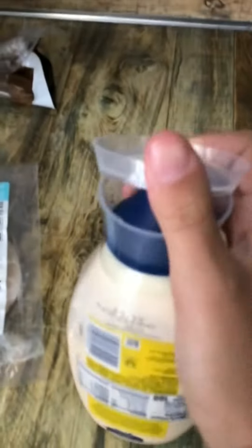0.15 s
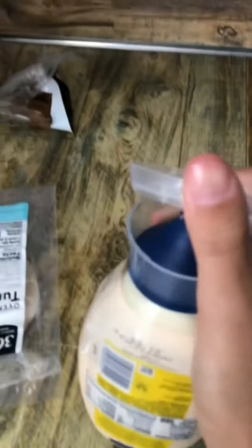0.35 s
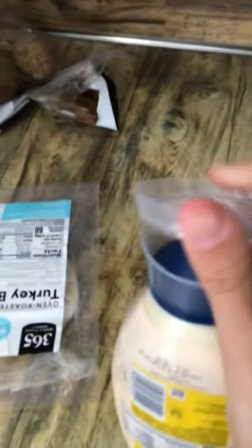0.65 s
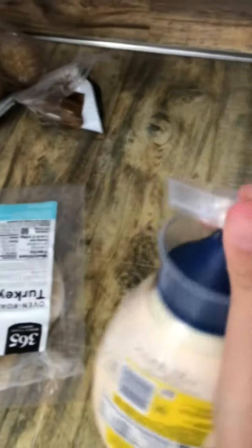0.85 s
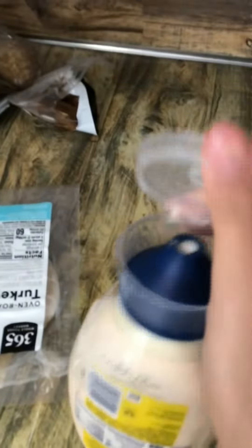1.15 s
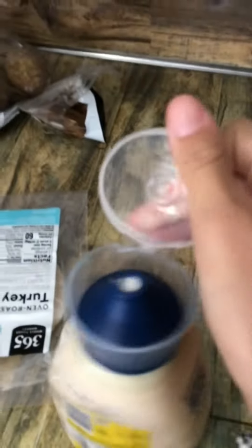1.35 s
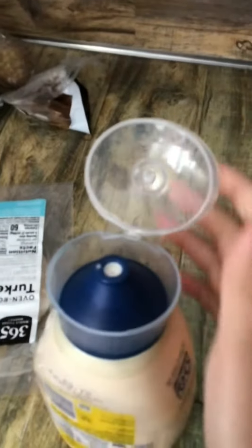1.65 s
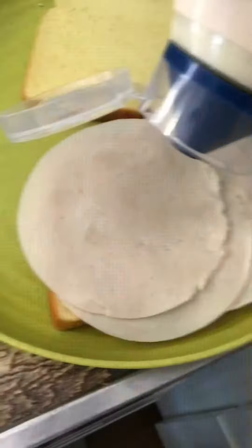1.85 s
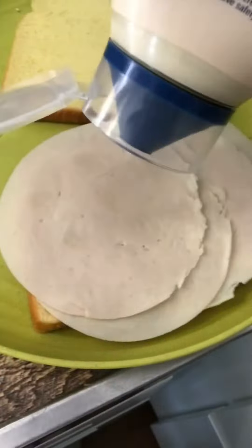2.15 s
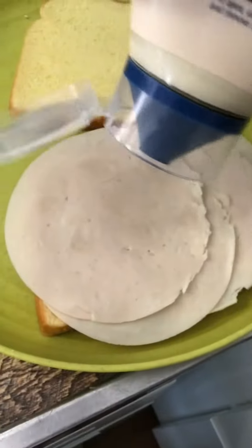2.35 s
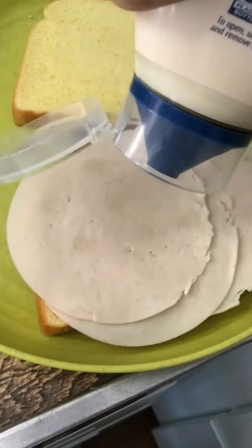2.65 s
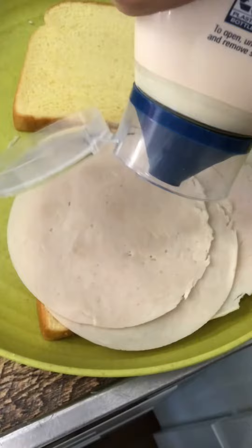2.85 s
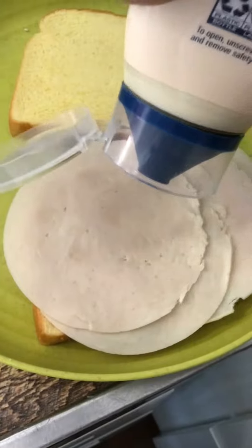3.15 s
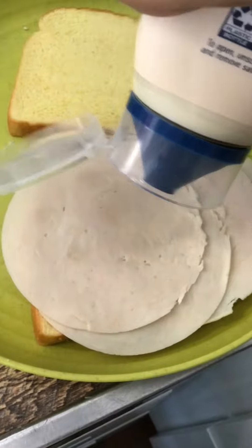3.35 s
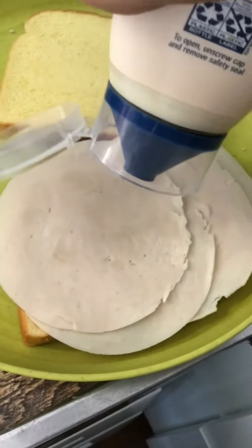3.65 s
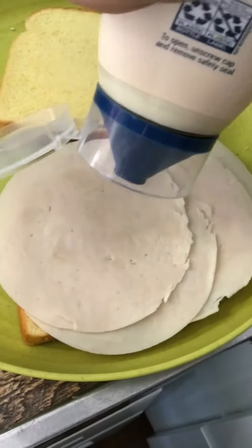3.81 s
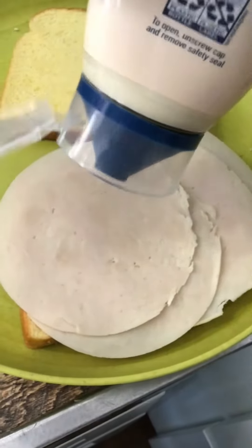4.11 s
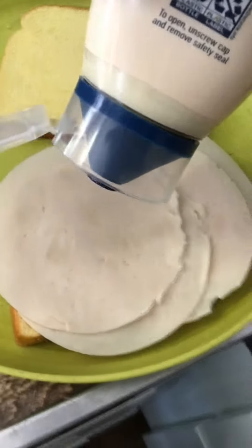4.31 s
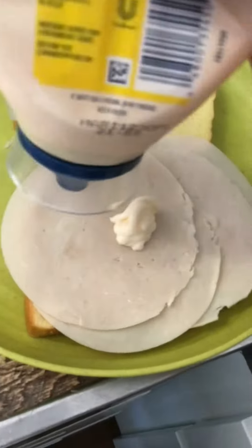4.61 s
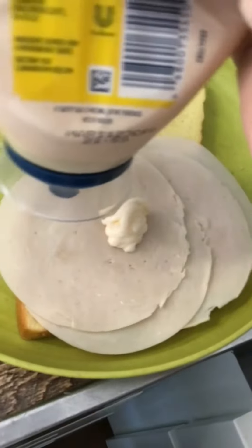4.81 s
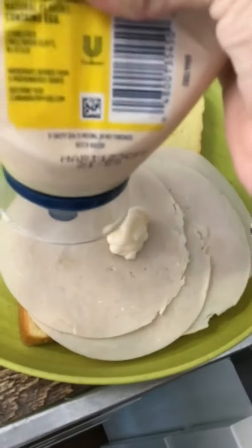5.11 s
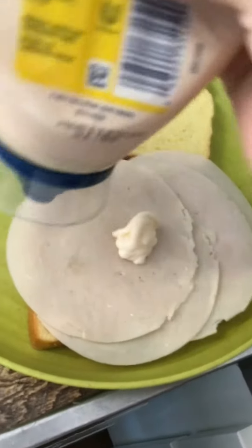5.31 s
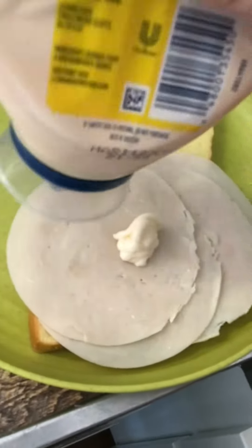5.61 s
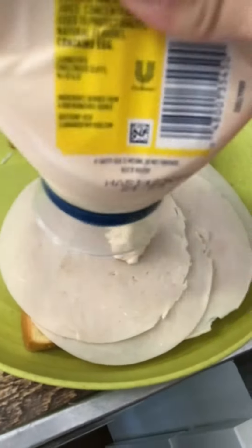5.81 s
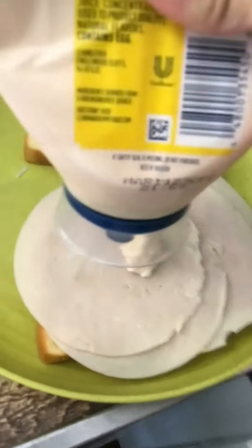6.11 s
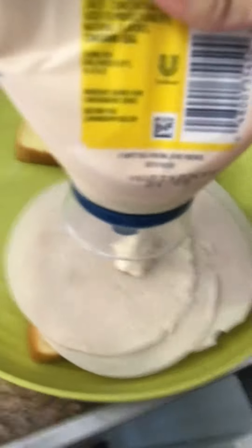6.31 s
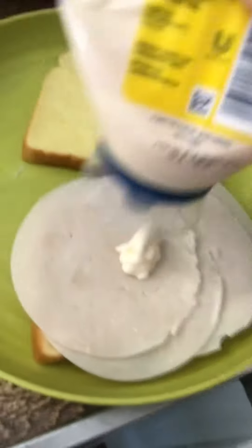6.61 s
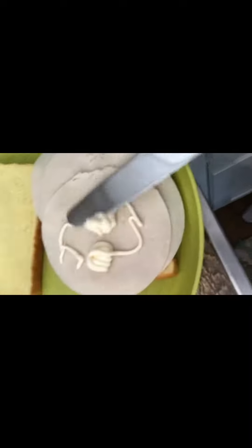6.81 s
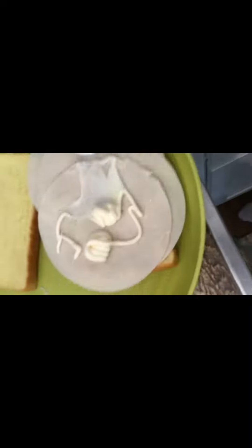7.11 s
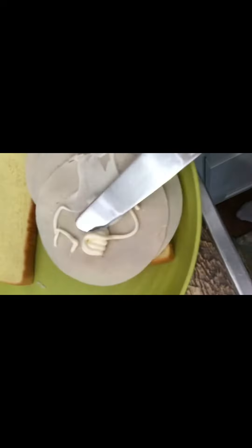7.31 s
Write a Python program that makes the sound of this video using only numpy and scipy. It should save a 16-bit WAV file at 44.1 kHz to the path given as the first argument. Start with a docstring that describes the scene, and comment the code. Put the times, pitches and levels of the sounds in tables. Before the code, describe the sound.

In a small humming kitchen, a plastic bottle is bumped, flipped open and squeezed with sharp crackles, hollow pops and one wet spit.

```python
"""Squeezing sauce over a sandwich

In a small room where an appliance hums, a thumb rubs on the lid of a plastic squeeze bottle and the bottle
bumps the counter (decaying sines). The lid snaps open and the plastic crackles (noise bursts through resonances).
The walls buckle (low sine thumps and clacks), air hisses through the nozzle (coloured random grains) and
sauce splutters (quick pulses ring the nozzle's air). A soft smear (finer, darker grains) fades at the end."""
import sys
import numpy as np
from scipy import signal
from scipy.fft import rfft, irfft
from scipy.io import wavfile
from scipy.ndimage import uniform_filter1d

SR = 44100
rng = np.random.default_rng(int(sys.argv[2]) if len(sys.argv) > 2 else 0)


def generate_wav(signal):
    """Clip the signal to [-1, 1] and save it as 16-bit WAV at the path in sys.argv[1]."""
    frames = np.transpose(np.atleast_2d(signal))
    scaled = np.clip(frames, -1, 1) * 32767
    pcm = np.round(scaled).astype(np.int16)
    wavfile.write(sys.argv[1], SR, pcm)


N = 328986
TIME = np.arange(N) / SR  # the whole scene, in seconds
RING_TIME = TIME[:SR // 2]  # half a second, for one short sound

# Colour of a dull knock, for bumps and wall clacks: (frequency [Hz], level [dB])
KNOCK_COLOUR = [(30, -36), (100, -16), (350, 12), (700, 0), (1400, -1), (2500, -12), (5000, -24),
                (16000, -44)]


def amp(db):
    """Turns decibels into a gain."""
    return 10 ** (np.asarray(db) / 20)


def unit(x):
    """Scales a sound to an average strength (rms) of 1."""
    return x / np.sqrt(np.mean(x ** 2) + 1e-30)


def read(points, hz):
    """Reads a table between its points, along a log-frequency axis."""
    f, value = np.transpose(points)
    return np.interp(np.log(hz + 1), np.log(f), value)


def level(curve):
    """Turns a (time [s], level [dB]) curve into a smoothed gain, practically silent outside the curve."""
    s, db = np.transpose(curve)
    gain = amp(np.interp(TIME, s, db, left=-140, right=-140))
    return uniform_filter1d(gain, 128)


def add(mix, s, sound):
    """Mixes a sound in at time s."""
    part = mix[max(round(s * SR), 0):][:len(sound)]
    part += sound[:len(part)]


def colour(x, points, size=4096):
    """Filters a sound to a (frequency [Hz], level [dB]) colour, without any sound ahead of its cause."""
    gain = amp(read(points, np.fft.rfftfreq(size, 1 / SR)))
    # folding the cepstrum makes the filter minimum-phase
    cepstrum = irfft(np.log(gain))
    cepstrum[1:size // 2] *= 2
    cepstrum[size // 2:] = 0
    response = irfft(np.exp(rfft(cepstrum)))
    return signal.oaconvolve(x, response)[:len(x)]


def resonate(x, hz, width_hz):
    """Lets through one resonance, with gain 1 at its centre."""
    b, a = signal.iirpeak(min(hz, SR / 2 - 1), hz / width_hz, SR)
    return signal.lfilter(b, a, x)


def burst(decay_s):
    """Makes noise of energy 1 that dies away exponentially."""
    x = rng.standard_normal(len(RING_TIME)) * np.exp(-RING_TIME / max(decay_s, 1 / SR))
    return x / np.linalg.norm(x)


def struck(x, size=220):
    """Scales a blow so that its loudest 5 ms have rms 1."""
    return x / np.sqrt(uniform_filter1d(x ** 2, size).max())


def ring(modes):
    """Adds up dying sines, each from (frequency [Hz], level [dB], time to fall 60 dB [s])."""
    return sum(amp(db - 60 * RING_TIME / t60) * np.sin(2 * np.pi * hz * RING_TIME) for hz, db, t60 in modes)


def kitchen(x, size=256):
    """Gives the diffuse echo of the small room: noise that dies at a different speed in each band."""
    # How long the echo lasts: (frequency [Hz], time to fall 60 dB [s])
    echo_t60 = [(150, 0.24), (500, 0.2), (2500, 0.25), (4000, 0.23), (6000, 0.23), (10000, 0.18),
                (16000, 0.19)]
    hz, t, z = signal.stft(rng.standard_normal(len(RING_TIME)), SR, nperseg=size)
    fade = amp(-60 * t / read(echo_t60, hz)[:, None])
    tail = signal.istft(z * fade, SR, nperseg=size)[1][:len(RING_TIME)]
    tail *= 1 - np.exp(-(RING_TIME / 0.0027) ** 2)  # the echo builds up over a few ms
    return signal.fftconvolve(x, tail / np.linalg.norm(tail))[:len(x)]


def grains(per_s, spread_db):
    """Makes tiny slips at random times, a few larger than the rest."""
    sizes = amp(spread_db * np.minimum(rng.exponential(1, N), 4)) * rng.standard_normal(N)
    return sizes * (rng.random(N) < per_s / SR)


def flutter(rate_hz, depth_db):
    """Makes a gain that wavers at random, below rate_hz and by depth_db rms."""
    lowpass = signal.butter(2, rate_hz, fs=SR, output="sos")
    slow = signal.sosfilt(lowpass, rng.standard_normal(N))
    return amp(depth_db * unit(slow))


def room_air(upper_db=-69.5):
    """The quiet air of the room is steady coloured noise, set by its strength above 500 Hz."""
    # Colour of the room air: (frequency [Hz], level [dB])
    air_colour = [(15, -88), (25, -61.5), (76, -45.5), (89, -37.5), (108, -13.5), (130, -14.5),
                  (145, -33.5), (217, -13), (293, -14.5), (326, -11.5), (405, -25.5), (677, -30.5),
                  (2220, -44), (6210, -46.5), (16000, -57)]
    air = colour(rng.standard_normal(N), air_colour)
    upper = signal.sosfilt(signal.butter(6, 500, "high", fs=SR, output="sos"), air)
    return amp(upper_db) * air / upper.std()


def appliance_hum(louder_from_s=1.86, early_db=-10.0):
    """The appliance hums in sines whose phase wanders at random; the hum is softer at first."""
    # Tones of the hum: (frequency [Hz], rms level once louder [dB], width of the wander [Hz])
    tones = [(121, -74, 12), (328.8, -55, 1), (384.4, -68, 6.7)]
    hum = np.zeros(N)
    for hz, db, width_hz in tones:
        drift = np.cumsum(rng.standard_normal(N)) * np.sqrt(abs(width_hz) / SR)
        hum += amp(db) * np.sqrt(2) * np.sin(2 * np.pi * hz * TIME + drift)
    return hum * np.where(TIME > louder_from_s, 1, amp(early_db))


def thumb_rub(lid_db=3, lid_opens_s=1.17):
    """The thumb slides in tiny slips that ring the lid; its pushes stop when the lid opens."""
    # Pushes of the thumb: (middle [s], level [dB], half length [s])
    pushes = [(0.223, -65, 0.057), (0.528, -67, .07), (0.678, -54, 0.017), (0.843, -55, .04),
              (0.974, -61.5, 0.053), (1.179, -36, 0.063)]
    # Colour of the rubbing: (frequency [Hz], level [dB])
    rub_colour = [(350, -48), (600, -10.5), (2570, 2), (3080, -5), (3680, -1), (5190, -4.5), (6370, -5.5),
                  (10500, -7), (13600, -7), (16000, -13.5)]
    # Resonances of the lid: (frequency [Hz], width [Hz], level before lid_db is added [dB])
    lid_modes = [(2600, 210, -14), (3700, 99, -11), (4300, 160, -8), (6300, 210, 6.5), (9070, 210, -2.5)]
    push = sum(amp(db) * np.exp(-((TIME - s) / half_s) ** 2) for s, db, half_s in pushes)
    push = push * (TIME < lid_opens_s)
    slips = colour(grains(3000, 0.72), rub_colour)
    lid = sum(amp(lid_db + db) * resonate(slips, hz, width_hz) for hz, width_hz, db in lid_modes)
    return unit(slips + lid) * push * flutter(120, 0.39)


def bumps(rise_s=0.014, thud_t60=0.13, thud_db=1, knock_db=-1, room_db=-10, boom_db=-9):
    """The full bottle bumps the counter: a dull knock, then a low thud swells with the counter's own tones."""
    # Bumps, before thud_db and knock_db are added:
    # (time [s], thud level [dB], thud frequency [Hz], knock level [dB], counter level against thud [dB])
    bump_table = [(0.481, -29, 131.2, -42, -22), (0.72, -32.5, 140, -44.5, -13),
                  (1.171, -13.5, 135, -21, -6), (1.322, -35, 145.5, -39, -10), (1.412, -43, 167, -42, 13),
                  (1.422, -30, 145.7, -34, -11)]
    # Tones of the counter top: (frequency [Hz], level [dB], time to fall 60 dB [s])
    counter_modes = [(121.3, 1, 0.16), (224.6, -6, 0.27), (271.7, 0, 0.18), (321, -5.5, 0.11),
                     (615, -16.5, 0.078), (1013, -22, 0.07)]
    out = np.zeros(N)
    for s, db, hz, hard_db, counter_db in bump_table:
        thud = ring([(hz, 0, thud_t60)]) + amp(counter_db) * ring(counter_modes)
        thud = thud * (1 - np.exp(-(RING_TIME / rise_s) ** 2))
        thud = amp(db + thud_db) * thud / abs(thud).max()
        knock = amp(hard_db + knock_db) * struck(colour(burst(.011), KNOCK_COLOUR))
        echo = kitchen(amp(room_db) * knock + amp(boom_db) * thud)
        add(out, s + 0.00093, thud + knock + echo)
    return out


def snap_colour(level_db, tilt_db, ring_hz, hump_db=5, hump_octaves=0.54, trim_db=-1.5, size=60):
    """Colours one snap: the shell's colour, tilted in the treble, with a hump where its panel rings."""
    # Colour shared by all snaps: (frequency [Hz], level [dB])
    shell_colour = [(40, -32.5), (200, -14), (750, -2), (1900, 7.5), (4400, 7.5), (8000, 6.5), (13000, 3.5)]
    pivot_hz, tilt_from_hz = 6440, 1600
    hz = np.geomspace(40, 16000, size)
    tilt = tilt_db * np.log2(np.maximum(hz, tilt_from_hz) / pivot_hz)
    hump = hump_db * np.exp(-(np.log2(hz / ring_hz) / hump_octaves) ** 2)
    return np.column_stack([hz, level_db + trim_db + read(shell_colour, hz) + tilt + hump])


def snaps(shell_db=-4, shell_s=0.0046, ring_db=4, ring_width_hz=700, lag_s=.0001,
          echo_db=1, echo_ring_db=-1, count=4):
    """A crease flips: a sharp crack scatters through the shell, and a few close tones of one panel ring."""
    # Snaps, before the lag, snap colour trim and echo_db are added: (time [s], level [dB],
    # brightness [dB per octave], panel frequency [Hz], crack decay [s], echo level against snap [dB])
    snap_table = [(1.1723, -31.5, -3.5, 2160, 0.0089, -25), (1.1986, -41.5, -1, 4050, 0.0013, -20),
                  (1.319, -62, -10.5, 2120, 0.0024, -17), (1.8682, -38, 5, 9600, .006, -16.5),
                  (2.0407, -39, 7.5, 8300, .002, -15), (2.0849, -38, 7.5, 12100, 0.0012, -14.5),
                  (2.1, -35.5, 4, 5500, .003, 5), (2.1167, -26, -1, 9300, 0.0038, -23),
                  (2.1222, -20.5, -1, 9200, 0.0027, -13), (2.1824, -25, 0.5, 8300, 0.0044, -14.5),
                  (2.2517, -46, 0.5, 6400, 0.0016, -11.5), (2.4727, -51.5, -1, 5170, .002, -12.5),
                  (2.4826, -33, -3, 1570, .0015, -20), (2.5747, -53, -2.5, 8600, 0.0013, -12),
                  (2.6315, -23.5, 2.5, 7170, 0.0015, -14), (2.802, -19, 5.5, 4360, 0.0039, -9.5),
                  (2.8066, -17, 0.5, 2065, 0.0021, -13.5), (2.8484, -29, 8, 5530, 0.002, -36),
                  (2.878, -15, -0.5, 2800, .0012, -10), (3.1008, -26.5, 2.5, 3960, 0.0037, -14.5),
                  (3.2169, -29, 2, 6560, 0.00044, -17.5), (3.419, -58.5, -4, 1695, 0.0022, -21.5),
                  (3.639, -36.5, -2.5, 12500, 0.0031, 0), (3.6706, -45, -4.5, 6200, .002, -14),
                  (3.6876, -41, 12, 7500, .002, -7.5), (3.696, -38.5, -9, 1946, .003, -35),
                  (3.732, -28.5, 7.5, 5210, 0.0044, -14), (3.758, -25, 6.5, 10450, 0.0011, -15.5),
                  (3.864, -49.5, -1.5, 12550, 0.0029, -17), (3.909, -55, -1.5, 4490, 0.0021, -19),
                  (4.072, -55.5, 7, 12800, 0.003, -15.5), (4.137, -51.5, -1.5, 2104, 0.0047, -12),
                  (4.16, -52.5, 3, 6550, 0.0016, -11), (4.22, -57, -5, 5000, .002, -22),
                  (4.2549, -36.5, 2, 4840, 0.0051, -16.5), (4.302, -40.5, 4.5, 11720, 0.0024, -16.5),
                  (4.4, -45, -1, 8200, .002, -12), (4.503, -58.5, -1, 9970, .0012, -14.5),
                  (5.193, -59.5, -4.5, 2760, 0.0045, -12.5), (5.265, -36.5, 0.5, 9000, .0013, -16),
                  (5.323, -39, -1, 4476, 0.00073, -21.5), (5.355, -57.5, -6.5, 4130, .003, -17),
                  (5.413, -42, -2, 8560, 0.00057, -14), (5.4353, -35, 0, 8360, 0.00068, -11.5),
                  (5.496, -31, 0.5, 10100, 0.0014, -3.5), (5.5, -26, 2.5, 8660, 0.00099, -11.5),
                  (5.523, -26.5, 0.5, 8700, 0.0029, -16.5), (5.574, -37.5, -2.5, 7470, 0.0033, -19.5),
                  (5.5826, -31, 2, 4630, .002, -16.5), (5.6473, -56.5, -10.5, 2080, 0.0022, -9),
                  (5.7315, -49, 4, 8900, 0.00091, -19), (5.744, -40.5, -3, 9200, 0.0038, -12.5),
                  (5.9263, -41.5, 1.5, 4160, 0.0021, -16.5), (6.505, -64, -3, 7460, 0.0022, -18),
                  (6.551, -54.5, -7.5, 2480, 0.00084, -14.5), (6.6763, -40.5, 0.5, 3786, 0.0038, -40)]
    out = np.zeros(N)
    for s, level_db, tilt_db, ring_hz, crack_s, room_db in snap_table:
        shape = snap_colour(level_db, tilt_db, ring_hz)
        crack = burst(crack_s)
        crack[0] += 1  # the first instant of the flip
        shell = burst(shell_s) * (1 - np.exp(-RING_TIME / 0.00081))
        modes_hz = ring_hz * rng.uniform(0.59, 1.4, count)
        panel = resonate(shell, ring_hz, ring_width_hz)
        panel = panel + sum(resonate(shell, hz, 250) for hz in modes_hz)
        snap = crack + amp(shell_db) * (shell + amp(ring_db) * panel)
        # the crack comes back from the nearest fold, which hollows out the spectrum in ripples
        add(snap, rng.uniform(.0003, .0009), -.35 * snap)
        snap = colour(struck(snap), shape)
        # the room hears the same colour, with extra strength near the panel's ring
        radiated = colour(signal.unit_impulse(len(snap)), shape)
        radiated = radiated + amp(echo_ring_db) * resonate(radiated, ring_hz * 1.08, 750)
        echo = kitchen(radiated) * np.linalg.norm(snap) / np.linalg.norm(radiated)
        add(out, s + lag_s, snap + amp(room_db + echo_db) * echo)
    return out


def wall_creases(attack_s=.008, settle_db=-17, trim_db=-1, room_db=-10.5):
    """The wall creases under the grip in tiny dry ticks, strongest at once and then settling."""
    # Squeezes, before trim_db is added: (time of peak [s], length of settling [s], level [dB])
    squeezes = [(2.093, 0.15, -46), (2.81, 0.21, -38.5), (3.632, 0.21, -45), (4.107, .3, -63),
                (5.256, 0.16, -57.5), (5.477, 0.4, -53), (6.493, 0.11, -58.5)]
    # Colour of the small creases: (frequency [Hz], level [dB])
    crease_colour = [(300, -17.5), (1000, -10), (2200, 5), (3300, -5), (5200, 2.5), (6800, -5.5), (9000, 1),
                     (12000, -5.5), (16000, -15)]
    grip = sum(level([(s - attack_s, db - 14), (s, db), (s + length_s, db + settle_db)])
               for s, length_s, db in squeezes)
    ticks = signal.oaconvolve(grains(120, 2.5), burst(0.0014))[:N]
    crease = unit(colour(ticks, crease_colour)) * grip * amp(trim_db)
    return crease + amp(room_db) * kitchen(crease)


def buckles(clack_db=-2, thump_db=2, thump_t60=0.034, room_db=-10, knock_db=3):
    """A wall pops in or out: it pumps the air in the bottle and sets the wall's tones clacking."""
    # Buckles, before thump_db and clack_db are added:
    # (time [s], thump level [dB], thump frequency [Hz], clack level [dB])
    buckle_table = [(2.101, -13.5, 264, -28.5), (2.18, -13.5, 257, -31.5), (2.4812, -22.5, 276, -25),
                    (2.807, -5.5, 248, -17.5), (2.877, -15, 270, -21), (3.099, -25.5, 220, -52),
                    (3.695, -17.5, 243, -24), (4.388, -42.5, 285.5, -55), (5.521, -30, 284, -41),
                    (5.664, -33.5, 241, -45), (6.558, -34, 318, -48)]
    # Tones of the wall: (frequency [Hz], level [dB], time to fall 60 dB [s])
    wall_modes = [(545, -12, 0.054), (908.5, -5.5, 0.05), (1350, -6.5, 0.017), (1508.5, 4, .035),
                  (1579, -3, 0.057), (1766, -2, 0.091), (2186, -15.5, .16), (2358, -14, 0.11),
                  (2720, -17, .1)]
    out = np.zeros(N)
    for s, db, hz, wall_db in buckle_table:
        thump = ring([(hz, db + thump_db, thump_t60)]) * (1 - np.exp(-(RING_TIME / 0.0027) ** 2))
        knock = struck(colour(burst(0.0065), KNOCK_COLOUR))
        clack = struck(struck(ring(wall_modes)) + amp(knock_db) * knock)
        pop = thump + amp(wall_db + clack_db) * clack
        add(out, s + .001, pop + amp(room_db) * kitchen(pop))
    return out


def nozzle_air(whistle_hz=1880, width_hz=260, whistle_db=-2, upper_hz=3650, upper_db=-11, hiss_db=-3):
    """Air rasps through the wet nozzle; a hoarse whistle grows faster than the hiss as the flow rises."""
    # Strength of the air drawn through the nozzle: (time [s], level [dB])
    airflow = [(3.43, -81), (3.44, -62), (3.518, -52.5), (3.572, -51), (3.608, -46), (3.632, -46.5)]
    # Colour of the hiss: (frequency [Hz], level [dB])
    hiss_colour = [(410, -64), (700, -35), (738, -16), (910, -25), (984, -15), (1620, -7), (1820, -11.5),
                   (2490, -15), (3550, -10.5), (4730, -24), (7290, -23), (9600, -15.5), (10500, -22),
                   (13700, -13), (16000, -15)]
    flow = level(airflow)
    hiss = unit(colour(grains(4000, 0.89), hiss_colour)) * flow
    whistle = resonate(resonate(grains(1300, 1.5), whistle_hz, width_hz), whistle_hz, 700)
    whistle = unit(whistle) * flow ** 2 / flow.max()
    upper = unit(resonate(grains(1200, 1.4), upper_hz, width_hz)) * flow
    air = amp(hiss_db) * hiss + amp(whistle_db) * whistle + amp(upper_db) * upper
    return air * flutter(120, 0.77)


def splutter(spray_s=0.0079, flap_db=-5, room_db=-17, sag=0.075, sag_s=0.006, low_hz=300, count=5):
    """Trapped air flaps through the sauce in quick pulses; the cavity rings and slides up, with a wet spray."""
    # Air spits: (time [s], level [dB], flaps per second [Hz], first spray's level against the spit [dB])
    spits = [(4.515, -22.5, 490, 1), (4.5327, -27, 515, -24.5)]
    # Tones of the air behind the nozzle: (frequency [Hz], level [dB], time to fall 60 dB [s])
    nozzle_modes = [(474, -3, 0.13), (547, 5.5, 0.1), (714, -11, 0.087), (1014, -5, 0.14), (1284, 0, 0.093),
                    (1430, -5, 0.04), (1527, 1, .05), (1730, 10, 0.026)]
    # Colour of the wet spray: (frequency [Hz], level [dB])
    spray_colour = [(40, -58), (200, 3), (500, 1), (1500, -0.5), (2700, -19), (3800, -8), (5000, -13.5),
                    (11000, -16.5), (16000, -19)]
    gliding = RING_TIME - sag * sag_s * (1 - np.exp(-RING_TIME / sag_s))  # pitch starts flat, then settles
    cavity = sum(amp(db - 60 * RING_TIME / t60) * np.cos(2 * np.pi * hz * gliding)
                 for hz, db, t60 in nozzle_modes)
    cavity = signal.sosfilt(signal.butter(2, [low_hz, 2300], "band", fs=SR, output="sos"), cavity)
    out = np.zeros(N)
    for s, db, flap_hz, spray_db in spits:
        flaps = np.zeros(len(RING_TIME))
        for k in range(count):
            add(flaps, (k + rng.uniform(0, 0.18)) / flap_hz, amp([-1.5 * k]))
        hollow = struck(signal.fftconvolve(flaps, cavity)[:len(flaps)])
        wet_flaps = struck(colour(flaps, spray_colour))
        add(out, s, amp(db) * (hollow + amp(flap_db) * wet_flaps))
        spray = struck(colour(burst(spray_s), spray_colour))
        add(out, s - .003, amp(db + spray_db) * spray)
    return out + amp(room_db) * kitchen(out)


def smear(start_s=6.7, start_db=-61.5, fade_db_per_s=-12.5):
    """Sauce is smeared in many tiny soft slips that slowly fade."""
    # Colour of the smearing: (frequency [Hz], level [dB])
    smear_colour = [(290, -22), (500, -6), (868, -3.5), (998, -0.5), (1280, 1.5), (1950, -13.5),
                    (2960, -20), (3200, -35), (4160, -63), (7040, -120)]
    stroke = amp(start_db + fade_db_per_s * (TIME - start_s)) * (TIME > start_s)
    return unit(colour(grains(5000, 1.1), smear_colour)) * stroke


def scene():
    """Adds up all sources at one microphone."""
    room = room_air() + appliance_hum()
    bottle = thumb_rub() + bumps() + snaps() + wall_creases() + buckles()
    sauce = nozzle_air() + splutter() + smear()
    return (room + bottle + sauce)[None]


def record(dry, ceiling=0.95, low_cut_hz=70, top_hz=16100):
    """The microphone rounds hard peaks and sheds deep bass; the level dips briefly and the top treble is cut."""
    # Brief dips in level: (start [s], end [s])
    dips = [(1.858, 1.864), (4.425, 4.432), (6.692, 6.698)]
    rounded = ceiling * np.tanh(dry / ceiling)
    heard = signal.sosfilt(signal.butter(2, low_cut_hz, "high", fs=SR, output="sos"), rounded)
    gain = 1 - sum((TIME > start) & (TIME < end) for start, end in dips) * .97
    treble_cut = signal.firwin(255, top_hz, window=("kaiser", 9), fs=SR)
    return signal.oaconvolve(heard * uniform_filter1d(gain, 32), treble_cut[None], "same")


dry = scene()
out = record(dry)
generate_wav(out)
```